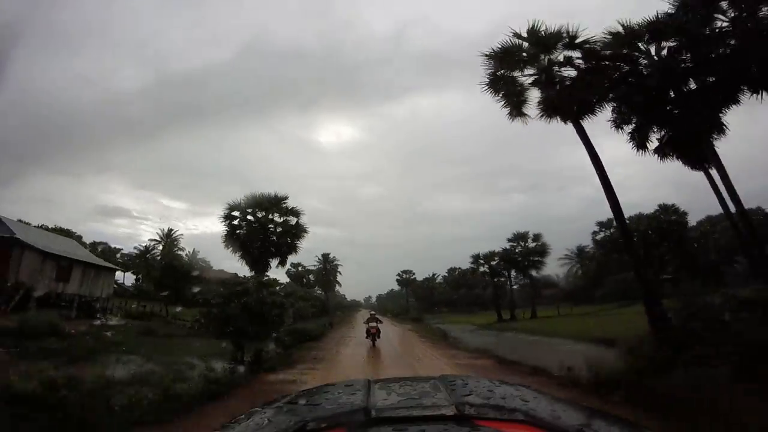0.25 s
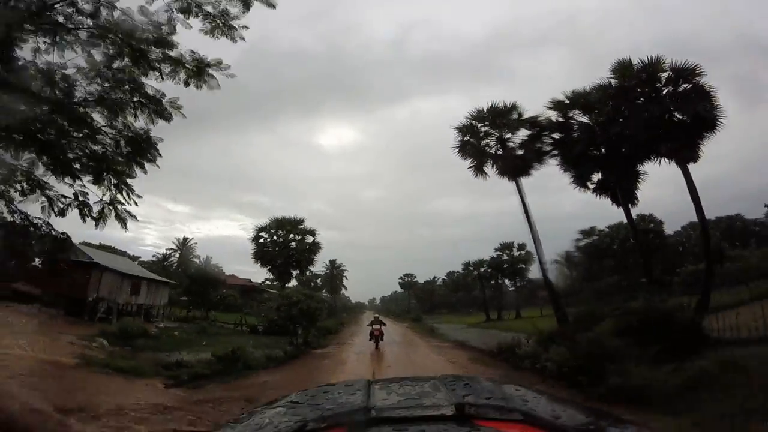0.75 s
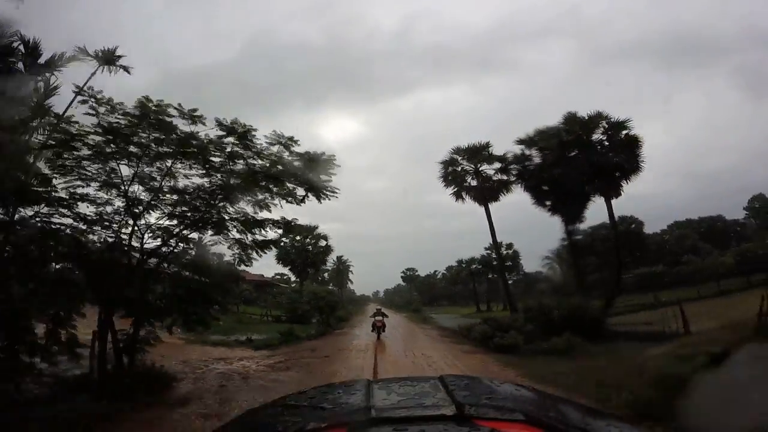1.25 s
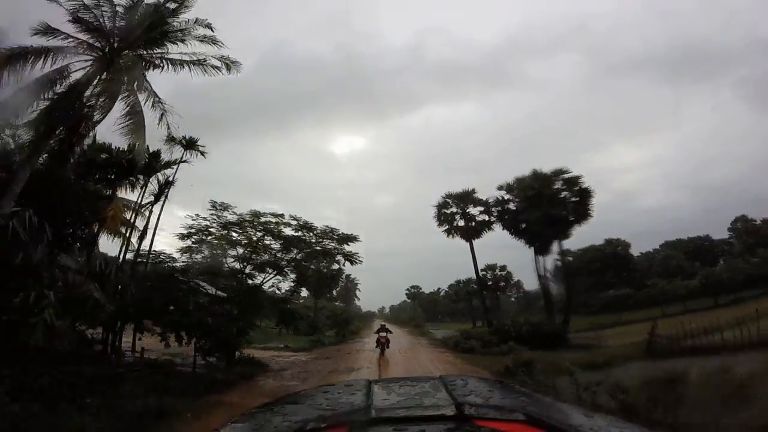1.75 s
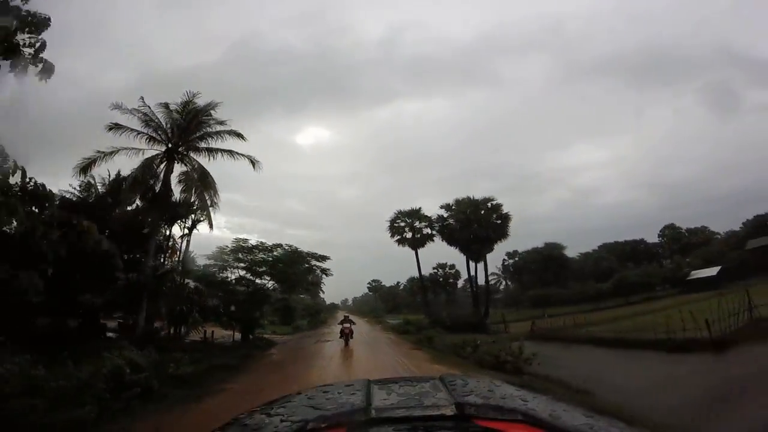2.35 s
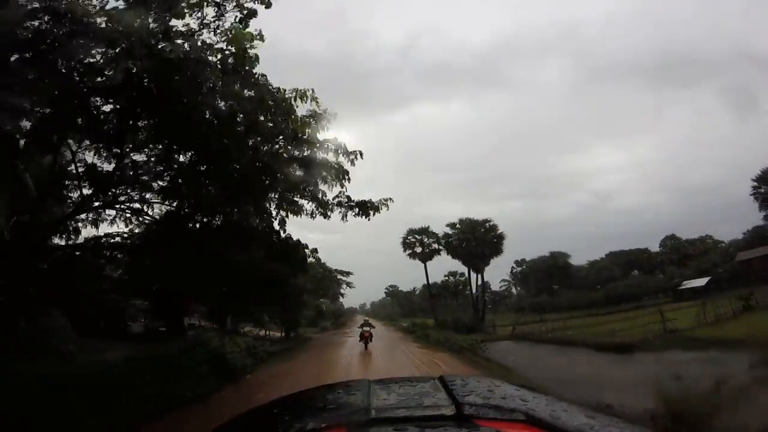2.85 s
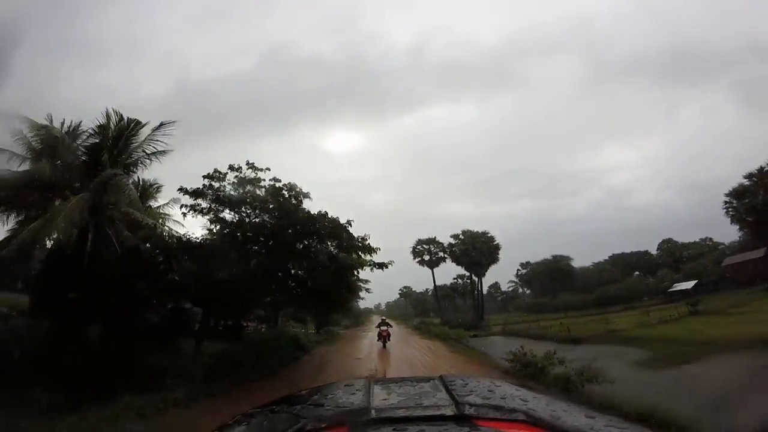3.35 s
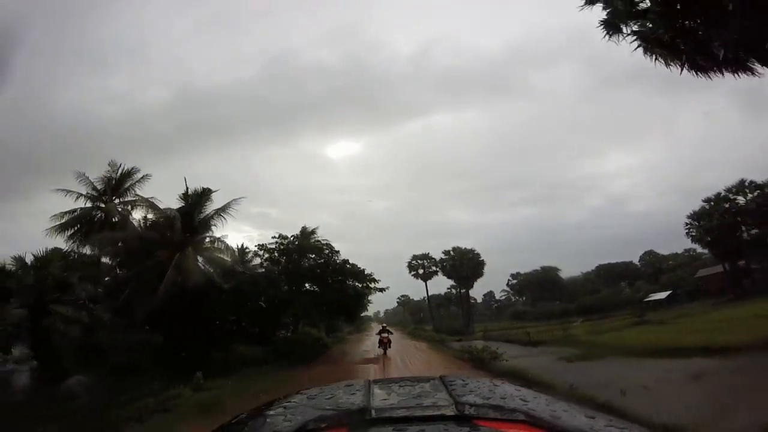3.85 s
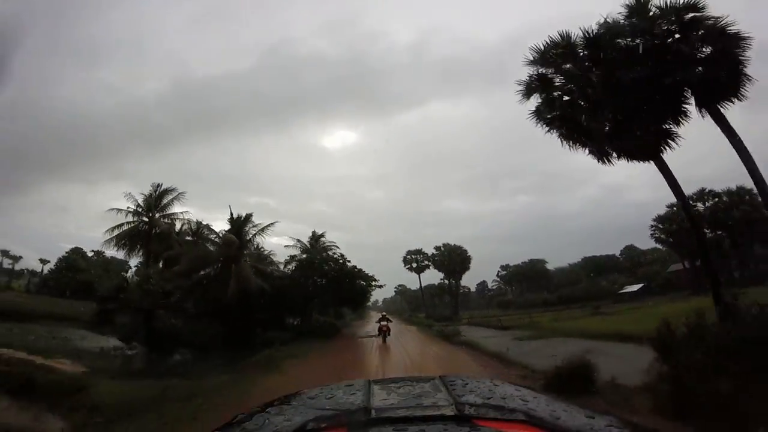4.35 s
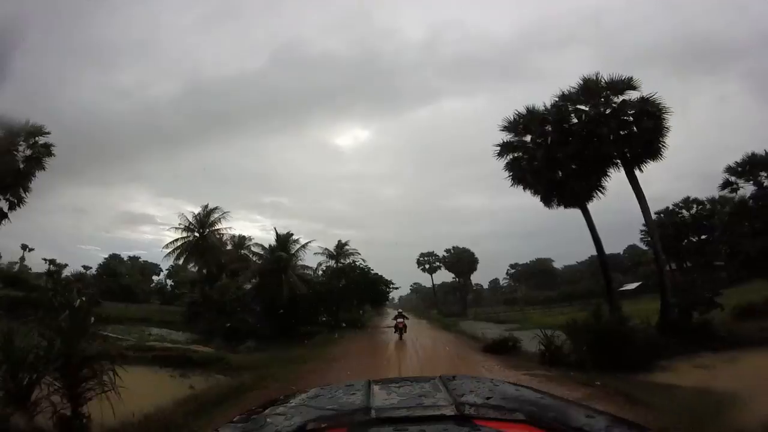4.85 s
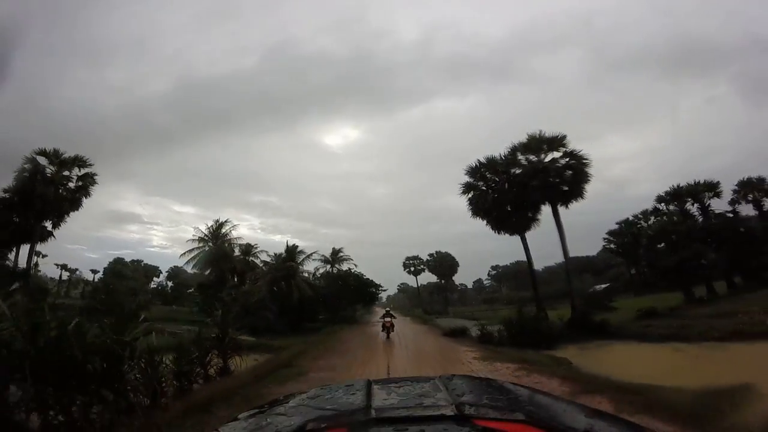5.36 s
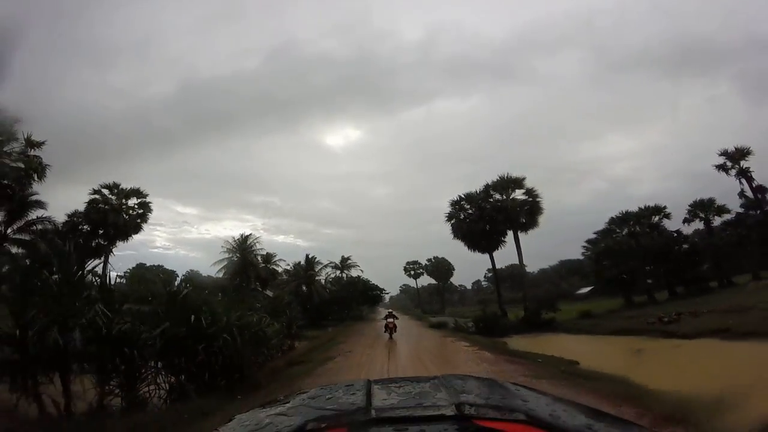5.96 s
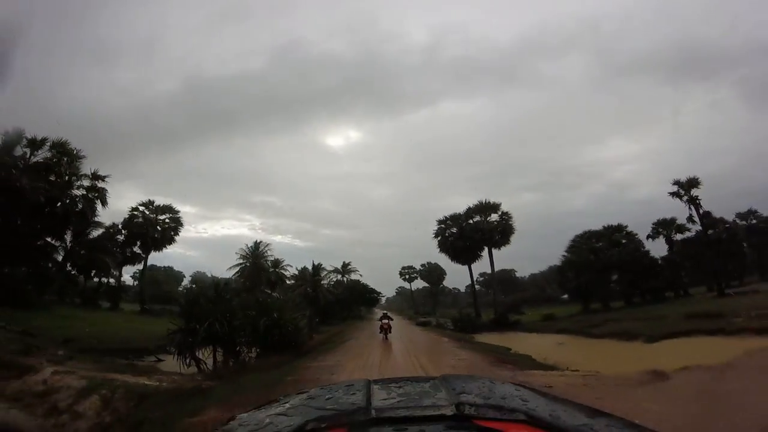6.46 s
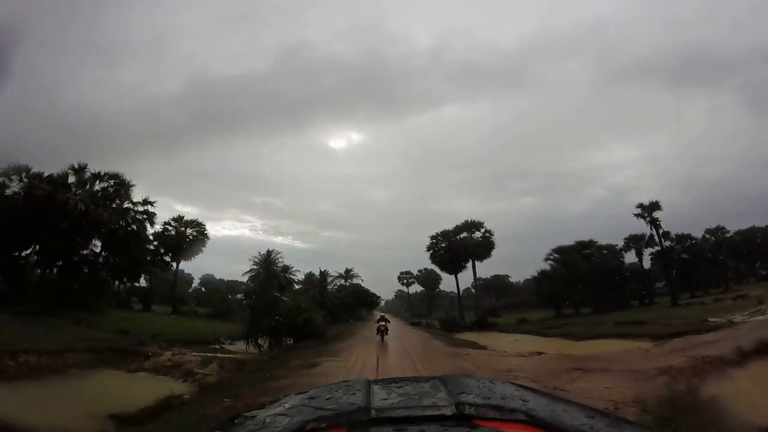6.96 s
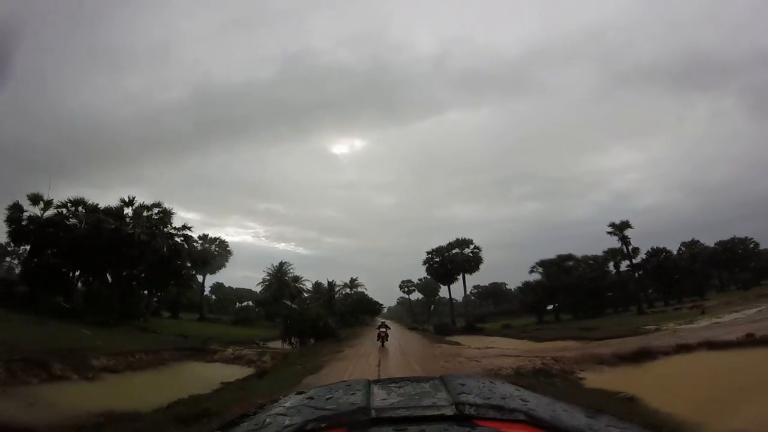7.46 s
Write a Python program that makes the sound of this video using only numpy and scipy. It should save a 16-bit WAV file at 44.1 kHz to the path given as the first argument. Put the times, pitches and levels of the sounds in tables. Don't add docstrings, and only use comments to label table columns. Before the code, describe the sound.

Raindrops crackle and tap densely on a sealed plastic camera case, close and boxy, over a muffled motorcycle engine hum and low wind buffeting.

```python
import sys
import numpy as np
from scipy import signal
from scipy.fft import rfft, irfft
from scipy.io import wavfile
from scipy.ndimage import uniform_filter1d

SR = 44100
rng = np.random.default_rng(int(sys.argv[2]) if len(sys.argv) > 2 else 0)


def amplitude_ratio(level_db):
    exponent = np.asarray(level_db, float) / 20
    return 10 ** exponent


def dump_mix(stems):
    frames = np.atleast_2d(stems).T
    limited = np.clip(frames, -1, 1)
    pcm = np.round(limited * 32767).astype(np.int16)
    wavfile.write(sys.argv[1], SR, pcm)


N = 340011

# mode in Hz, level in dB, T60 in s.
CAVITY = [(300, -4, .012), (466, -14, .05), (692, 0, .1)]


def level(x, db):
    return x * amplitude_ratio(db) / np.sqrt(np.mean(x ** 2))


def band(x, hz, width):
    return signal.lfilter(*signal.iirpeak(hz, hz / width, SR), x)


def band_twice(x, hz, width):
    return band(band(x, hz, width), hz, width)


def curve(s, values):
    return np.interp(np.arange(N) / SR, s, values)


def walk(rate):
    k = int(SR / rate)
    steps = np.repeat(rng.standard_normal(N // k + 1), k)
    return 1.867 * uniform_filter1d(uniform_filter1d(steps, k), k)[:N]


def turbulence(spectrum, lo_hz, octaves, flicker_db, rate):
    hz, db = np.transpose(spectrum)
    out = 0
    for f in lo_hz * 2 ** np.arange(0, octaves, 1 / 3):
        noise = band_twice(rng.standard_normal(N), f, f / 3)
        gain_db = np.interp(np.log(f), np.log(hz), db) + flicker_db * walk(rate)
        out = out + amplitude_ratio(gain_db) * noise
    return level(out, 0)


def strike(s, peak_db, modes, contact_s, variety=1, size=1024):
    spot_db, detune, tap_db = 2.6, .025, 3
    chance = rng.standard_normal((len(s), 2 * len(modes) + 1 + 256))
    t = np.arange(256) / SR / (contact_s * np.exp(0.4 * chance[:, :1]))
    push = chance[:, -256:] * np.tanh(9 * t) * (np.exp(-t / 1.5) + .08 * np.exp(-t / 8))
    push[:, 0] += amplitude_ratio(tap_db) * np.sqrt(np.sum(push ** 2, axis=1))
    jw = 2j * np.pi * np.arange(size // 2 + 1) * SR / size
    body = 0
    for k, (hz, db, t60) in enumerate(modes):
        w = 2 * np.pi * hz * (1 + variety * detune * chance[:, 2 * k + 1, None])
        gain = (-1) ** k * amplitude_ratio(db + variety * spot_db * chance[:, 2 * k + 2, None])
        body = body + gain * w / ((jw + np.log(1000) / t60) ** 2 + w ** 2)
    body = body * (jw / (jw + 2 * np.pi * modes[0][0])) ** 2
    body = body / (1 + jw / (3 * np.pi * modes[-1][0])) ** 2
    ring = irfft(rfft(push, size) * body, size)
    ring *= (amplitude_ratio(peak_db) / np.abs(ring).max(axis=1))[:, None]
    at = (np.asarray(s) * SR).astype(int)[:, None] + np.arange(size)
    return np.bincount(at.ravel(), ring.ravel(), N + size)[:N]


def on_case(s, walls_db, lid_db, splash_db, contact_s):
    # mode in Hz, level in dB, T60 in s.
    lid_modes = [(1545, 0, .015), (1850, -15, .008)]
    wall_modes = [(2080, -4, .006), (2640, 0, .007), (3310, -5, .007), (4100, -13, .006)]
    splash_modes = [(4250, -6, .005), (5050, -3, .003), (5600, -2, .004), (6100, -1, .004),
                    (6700, -6, .004), (7500, -6, .004), (8650, -11, .004), (9900, -12, .003),
                    (10700, -16, .003), (11600, -22, .003), (12950, -23, .003), (14900, -30, .003)]
    lid = strike(s, lid_db - .3, lid_modes, .5 * contact_s)
    walls = strike(s, walls_db - .3, wall_modes, contact_s)
    return lid + walls + strike(s, splash_db - .3, splash_modes, .8 * contact_s)


def wind():
    # frequency in Hz, level in dB per Hz.
    buffet = [(20, -15), (45, -6), (70, -12.5), (120, 0), (170, -15.5), (240, -23)]
    return amplitude_ratio(4.0) * turbulence(buffet, 22.37, 3.7, flicker_db=0.5, rate=7)


def seam_whistle():
    # time in seconds, level in dB.
    swell = [
        (4.75, -72),
        (4.95, -56),
        (5.3, -55),
        (5.58, -58),
        (5.72, -72),
    ]
    low = level(band_twice(rng.standard_normal(N), 4250, 1000), 6)
    high = level(band_twice(rng.standard_normal(N), 7620, 600), 1)
    return amplitude_ratio(curve(*np.transpose(swell))) * (low + high)


def engine():
    # time in seconds, firings per second.
    firing = [
        (0, 30.9),
        (1.9, 31.8),
        (4.7, 33.55),
        (5.9, 33.65),
        (7.71, 33.4),
    ]
    # time in seconds, level in dB.
    throttle = [
        (0, 0),
        (2.6, 0),
        (2.8, -4),
        (5.5, -5),
        (5.9, -8),
    ]
    # centre in Hz, width in Hz, level in dB.
    exhaust = [(131.4, 59, 4.5), (278.6, 86, -1.5), (340.4, 43, -0.5), (459.4, 46, 1.5)]
    cycle = np.cumsum(curve(*np.transpose(firing)) * (1 + .006 * walk(8))) / SR
    at = np.flatnonzero(np.diff(np.floor(cycle)))
    pulses = np.zeros(N)
    pulses[at] = amplitude_ratio(2.2 * rng.standard_normal(N // 500)[:len(at)])
    hum = 0
    for k, (hz, width, db) in enumerate(exhaust):
        hum = hum + (-1) ** k * amplitude_ratio(db) * band_twice(pulses, hz, 0.93 * width)
    gas = np.exp(-(cycle % 1) / 1.3) * band_twice(rng.standard_normal(N), 440, 290)
    return amplitude_ratio(curve(*np.transpose(throttle))) * level(hum, .3) + level(gas, -7)


def fine_rain(shower_db, count=1300):
    # frequency in Hz, level in dB per Hz.
    rush_spectrum = [(200, -6), (560, 17), (780, 14), (1000, -30), (1250, 8.5), (1520, 25.5), (2000, -17),
                     (2610, 14), (3340, 2.5), (4900, -26), (8590, -10), (13200, -63), (16000, -60)]
    when, size, low, high = rng.random((count, 4)).T
    walls_db = 8 * size ** 2
    lid_db = walls_db - 16 + 16 * low
    splash_db = walls_db - 25 + 12 * high ** 2
    patter = on_case(when * N / SR, walls_db, lid_db, splash_db, contact_s=.0004)
    hz = CAVITY[-1][0]
    hum = band(band(rng.standard_normal(N), hz, 28), hz, 120)
    hum = amplitude_ratio(0.14 * shower_db + 1.5 * walk(9)) * hum
    rush = turbulence(rush_spectrum, 200, 6.3, flicker_db=1.5, rate=30)
    return level(patter, -2.5) + level(rush, -4.5) + level(hum, -3.0)


def spray(count=3000):
    # mode in Hz, level in dB.
    mist = [(4300, 0), (5300, 0.5), (6500, -7.5), (8000, -11), (9800, -22.5), (11800, -14.5), (14000, -19)]
    modes = [(hz, db, .0025) for hz, db in mist]
    when, size = rng.random((count, 2)).T
    peak_db = -3.4 * np.log(size + 0.011)
    return level(strike(when * N / SR, peak_db, modes, 0.00038, size=256), 0)


def small_drops():
    # start in seconds, walls peak in dB, splash peak
    # in dB.
    darker = [(0.0565, -19, -33), (0.235, -20, -51), (0.5279, -18, -48), (0.8388, -11, -31),
              (0.9488, -23, -57), (1.2358, -18, -44), (1.3242, -17, -43), (1.37, -19, -41.0),
              (1.601, -17, -50.0), (1.8943, -36, -52), (2.3221, -24, -50), (2.4495, -23, -45),
              (2.7265, -19, -49), (2.857, -19, -46), (2.8711, -24, -39.0), (2.912, -15.5, -41.0),
              (2.962, -18.5, -38), (3.0933, -24, -47), (3.2122, -22, -46.0), (3.2154, -22.0, -33),
              (3.3271, -25, -43.0), (3.7364, -19, -39.0), (3.7526, -26, -42.0), (3.8888, -19, -41),
              (4.2174, -20, -36), (4.353, -32, -45), (4.754, -20, -41), (4.9948, -17, -40.0),
              (5.257, -20, -41.0), (5.3713, -18, -36.0), (5.4304, -19, -46), (5.5607, -19.5, -52),
              (5.678, -21, -34), (5.6963, -26, -56), (5.8234, -11, -34.0), (6.007, -17, -36),
              (6.0496, -23.0, -46.0), (6.158, -23.0, -45), (6.311, -25, -48.0), (6.423, -23.5, -42),
              (6.4764, -20.5, -39), (6.5012, -23.0, -49), (6.7382, -20.5, -35), (6.7816, -17.5, -41.0),
              (6.7938, -23, -41.0), (6.8737, -22, -49), (6.97, -24, -42.0), (7.0817, -19, -32),
              (7.1756, -18, -35), (7.4018, -22, -46),
              (0.099, -18, -32), (0.2076, -17.5, -35), (0.615, -27, -42), (0.69, -20, -41),
              (0.8114, -23, -31), (1.3015, -23, -44), (1.5878, -22, -35.0), (1.7075, -17, -25),
              (1.834, -33, -41.0), (2.037, -27, -46), (2.1596, -12.5, -31), (2.185, -23, -45),
              (2.201, -25, -57), (2.21, -20, -40), (2.387, -17, -36.0), (2.4644, -21, -40.0),
              (2.5133, -10, -33), (2.735, -19, -41), (3.1016, -31, -44), (3.1182, -12.5, -29.0),
              (3.189, -26, -42), (3.27, -23.0, -39), (3.6832, -21, -39), (3.7736, -12, -32.0),
              (3.8348, -20, -39), (3.8776, -22, -40), (3.923, -18, -33), (4.1094, -18, -35.0),
              (4.1202, -27, -40), (4.429, -23, -32.0), (4.7035, -17, -27), (4.8077, -12.5, -32),
              (5.013, -33, -33), (5.232, -14, -37), (5.344, -20, -31), (5.5695, -18, -36),
              (5.7517, -17, -35.0), (5.883, -23, -35), (5.9091, -28, -40), (5.9438, -18, -36),
              (6.0293, -34, -40.0), (6.064, -18, -35.0), (6.923, -14, -40), (7.0047, -12, -22),
              (7.2074, -18, -37), (7.2434, -8, -33), (7.2813, -27, -35), (7.4177, -18, -35.0),
              (7.433, -13, -38), (7.506, -19, -71)]
    bright = [(0.018, -29, -26), (0.592, -26, -40), (0.8528, -25, -31), (0.975, -34.0, -31),
              (1.025, -24, -30), (1.3469, -38, -37), (1.7229, -11, -15), (1.9034, -23, -35),
              (1.925, -21.0, -33), (1.983, -30, -28), (2.178, -27, -44), (2.2212, -30, -35),
              (2.371, -7.5, -33), (2.4888, -19, -40), (2.5626, -21, -31), (2.59, -21, -44),
              (2.6656, -29, -22), (2.6718, -25, -27), (2.777, -23, -26), (2.8107, -24.0, -28),
              (3.2774, -17, -31), (3.673, -23, -24), (3.7459, -19, -24), (3.9332, -32, -31),
              (4.0767, -30, -39), (4.2113, -31, -28), (4.379, -24, -27.0), (4.456, -27, -29),
              (4.4711, -26, -32), (4.512, -30, -25), (4.5518, -25, -25), (4.653, -26, -32),
              (4.7323, -24, -30), (4.7784, -27, -26), (4.885, -28, -30), (5.216, -19, -35),
              (5.273, -28.0, -29), (5.287, -22, -34), (5.3857, -23, -40), (5.565, -30, -34),
              (5.682, -20, -27.0), (5.6893, -22, -21), (5.8179, -25, -35.0), (5.8957, -20, -37.0),
              (5.9005, -22, -40), (6.0566, -19, -32), (6.124, -17, -24), (6.3315, -18, -31),
              (7.1073, -15, -21), (7.515, -19, -24), (5.638, -32, -26), (7.024, -26, -27)]
    s, walls_db, splash_db = np.transpose(darker + bright)
    return on_case(s - .0004, walls_db, walls_db - 12, splash_db, contact_s=0.0013)


def light_drops():
    # start in seconds, walls peak in dB, splash peak in dB.
    bright = [(0.337, -16, -29), (0.3658, -20, -20.5), (0.447, -13.5, -21.5), (1.503, -12, -21),
              (1.6489, -15, -30), (1.7745, -17, -23), (1.975, -13, -31.5), (2.6256, -12, -20),
              (3.359, -13.5, -18), (3.545, -13, -24), (3.706, -16, -27), (4.2217, -11, -19.5),
              (4.3894, -13, -18), (4.399, -11.5, -19), (4.484, -15, -20), (4.5447, -22, -16),
              (4.702, -21, -26), (4.8968, -11.5, -22.5), (5.191, -22, -13), (5.505, -13, -23),
              (6.109, -17, -17), (6.2, -13.5, -26), (6.281, -10, -29), (6.842, -15, -24),
              (7.2886, -19, -31), (7.5372, -17, -27)]
    # start in seconds, walls peak in dB.
    faint = [(0.0516, -14.5), (0.122, -17.5), (0.1535, -14), (0.843, -15), (1.203, -12), (1.2773, -13),
             (1.4524, -13), (1.612, -19), (2.317, -17), (2.422, -14), (2.511, -17), (2.9027, -13),
             (2.9308, -15), (3.1165, -25), (3.1987, -12.5), (3.2296, -15), (3.3457, -13), (3.7731, -37),
             (3.8, -15), (4.0037, -11.5), (4.218, -21), (4.6377, -11), (4.809, -25), (5.4567, -14),
             (5.528, -13), (5.7717, -9.5), (6.911, -15), (6.926, -19), (7.2309, -12), (7.435, -10)]
    rows = [(s, db, db - 11, wet) for s, db, wet in bright]
    rows += [(s, db, db - 24, db - 22) for s, db in faint]
    s, walls_db, lid_db, splash_db = np.transpose(rows)
    return on_case(s - .0003, walls_db, lid_db, splash_db, contact_s=0.0016)


def heavy_drops():
    # start in seconds, walls peak, lid peak and splash peak in dB.
    on_lid = [(0.0239, -8, -3.5, -15), (0.2905, -4, -6, -22), (0.5034, -17, -19, -31),
              (0.6557, -2, -2, -29), (0.7388, -11, -7.5, -21), (0.9628, -7.5, -7.5, -19),
              (1.0042, -4, -7.5, -23), (1.1271, -8, -9.5, -43), (1.2406, -11.5, -10.5, -17.5),
              (1.3122, -4.5, -6, -22), (2.0553, -13, -36, -18), (2.4063, -8, -9, -16.5),
              (3.1605, -9.5, -8.5, -14), (3.317, -20, -20, -38), (3.6045, -6, -10.5, -16.5),
              (3.8063, -3.5, -0.5, -14), (4.1387, -5.5, -9.5, -17.5), (4.3612, -25, -9, -14.5),
              (4.8259, -20, -6.5, -13.5), (5.1415, -6.5, -8.5, -12.5), (5.2472, -2.5, -4, -30),
              (5.4101, -5.5, -5.5, -13), (5.7204, -16, -4, -12), (5.8729, -6, -11, -17),
              (6.1334, -5.5, -4, -36), (6.2907, -15.5, -14, -20), (6.336, -10.5, -9, -26),
              (6.558, -17, -7, -20), (7.4461, -6.5, -6.5, -13), (7.7081, -4, -3, -11)]
    # start in seconds, walls peak in dB, splash peak in dB.
    at_port = [(0.3209, -4.5, -9), (1.5112, -17, -7.5), (1.575, -13.5, -10), (1.7225, -14, -13),
               (1.7329, -8, -5.5), (1.8102, -0.5, -2), (1.9898, -13, -11), (2.006, -9, -2),
               (2.1633, -9.5, -6), (2.434, -11, -14.5), (2.716, -2.5, -1.5), (3.638, -6.5, -2.5),
               (3.9957, -10, -9), (4.0874, -10, -8.5), (4.3725, -7.5, -12.5), (4.63, -9, -11),
               (4.677, -13, -3.5), (4.698, -10, -14), (5.197, -5.5, -6.5), (5.21, -6, -7), (5.731, -4, -8),
               (5.9247, -4.5, -3), (6.0934, -4.5, -1), (6.3603, -7.5, -8), (7.0169, -7, -14),
               (7.1968, -9.5, -15.5), (7.5081, -12, -13.5), (7.5329, -9, -12.5), (7.6256, -21, -7.5),
               (7.6674, -9, -4.5)]
    on_rim = [(0.7043, -12.5, -25), (0.7508, -17, -23), (0.772, -3, -30), (1.103, -2, -22),
              (1.559, -17, -18), (2.4718, -5.5, -16), (2.6112, -12.5, -21), (2.754, -9.5, -17),
              (2.881, -10, -20), (3.068, -7.5, -15), (3.1322, -13.5, -26), (3.427, -2, -22),
              (3.8241, -7, -18), (4.1298, -10, -15), (4.269, -3.5, -16), (4.7688, -9.5, -17),
              (4.9469, -6.5, -19), (5.092, -9.5, -16.5), (5.2527, -18, -39), (5.3929, -10, -14.5),
              (5.8253, -15, -22), (5.861, -7.5, -17), (5.9895, -8, -20), (6.0012, -8, -26),
              (6.2316, -15, -22.0), (6.5905, -10, -23), (6.69, -12, -20), (7.1039, -8, -10),
              (7.3694, -8.5, -19.5), (7.581, -0.5, -11.5)]
    on_near_wall = [(0.2424, -1.5, -8.5), (0.3165, -13, -20), (0.9241, -10, -20), (1.0885, -1.5, -19),
                    (1.416, -4.5, -18), (1.694, -10.5, -22), (1.868, -7, -13.5), (1.874, -3.5, -8),
                    (1.9119, -8.5, -17), (2.155, -15.5, -24), (2.369, -5, -15.5), (2.5017, -5, -13),
                    (3.3138, -3.5, -11), (3.653, -9, -14), (3.7796, -15, -15), (4.5027, -12, -22),
                    (4.5616, -9, -21), (4.5975, -9.5, -22), (5.2376, -5, -20), (5.4067, 1.5, -10),
                    (5.669, -7.5, -14.5), (5.9158, -6.5, -15), (5.994, -4, -12), (6.0056, -15, -34),
                    (6.212, -10.5, -24), (6.5491, -11, -22.5), (6.9648, -11.5, -21.5), (7.316, -10.5, -20),
                    (7.4285, -5, -11.5), (7.5282, -14, -40)]
    # start in seconds, walls peak in dB.
    on_far_wall = [(0.0344, -3), (0.371, -8.5), (0.939, -6.5), (0.988, -14), (1.013, -11), (1.268, -13),
                   (1.3861, -2), (1.69, -10), (1.9945, -3.5), (2.3756, -9), (2.499, -6), (2.6281, -7),
                   (2.823, -2.5), (3.6251, 0), (3.785, -7.5), (3.7938, 0), (4.2325, -3.5), (4.8528, -8.5),
                   (5.3565, -8), (5.4628, -0.5), (5.8368, -5), (6.0209, 0.5), (6.8594, -9), (7.0045, -7),
                   (7.01, -2.5), (7.2432, -12), (7.2545, -2.5), (7.2732, -3), (7.2784, -5.5), (7.3346, -7)]
    # start in seconds, splash peak in dB.
    port_ticks = [(0.647, -22.5), (1.7884, -25), (1.9637, -21), (2.482, -19), (2.6762, -24), (2.73, -24),
                  (2.8687, -22.5), (3.037, -20.5), (3.049, -21), (4.4325, -18.5), (4.759, -19.5),
                  (5.652, -19), (5.7023, -19), (5.806, -22), (6.4715, -26.5), (6.518, -25), (6.8205, -23),
                  (7.3845, -29), (7.39, -23.0), (7.543, -22), (7.5594, -23), (7.632, -15)]
    # mode in Hz, level in dB, T60 in s.
    thud = [(330, 0, .01)]
    rows = on_lid + [(s, db, db - 10, wet) for s, db, wet in at_port]
    rows += [(s, db + 4.5, db - 15, db) for s, db in port_ticks]
    rows += [(s, db, db - 4, wet) for s, db, wet in on_rim]
    rows += [(s, db, db - 15.5, wet) for s, db, wet in on_near_wall]
    rows += [(s, db, db - 15, db - 23.5) for s, db in on_far_wall]
    s, walls_db, lid_db, splash_db = np.transpose(rows)
    out = on_case(s - .0002, walls_db, lid_db, splash_db, contact_s=0.00038)
    return out + strike(s, lid_db - 22, thud, 0.00033)


def window_drops():
    # start in seconds, cavity ring peak in dB, pane ring peak in dB.
    hits = [(0.024, -31, -30), (0.3207, -27, -26), (1.0879, -34, -25), (2.312, -27, -37), (3.955, -29, -34),
            (5.69, -25, -40), (0.561, -24, -53), (1.479, -31, -26), (1.5114, -16, -6), (1.5589, -20, -16),
            (1.6901, -20.5, -36), (1.7329, -25.5, -16), (1.81, -52, -5.5), (2.0058, -19, -3),
            (2.0552, -24.5, -9), (2.164, -24.5, -41), (2.676, -22.5, -26), (2.7159, -30, -13),
            (2.8689, -22.5, -16), (3.3131, -25, -14), (3.6381, -24, -20), (4.0873, -19.5, -9.5),
            (4.4329, -25, -20), (4.6295, -22.5, -48.5), (4.677, -10.5, -9), (5.197, -20.5, -15),
            (5.731, -23, -11), (5.8609, -22, -18), (5.9248, -22.5, -27), (6.0931, -11, -4),
            (6.36, -16, -0.5), (7.5332, -24, -32), (7.6256, -17.5, -3.5)]
    # mode in Hz, level in dB, T60 in s.
    pane_modes = [(1690, 0, .03)]
    s, cavity_db, pane_db = np.transpose(hits)
    cavity = strike(s, cavity_db + .3, CAVITY, .00012, variety=.15, size=8192)
    return cavity + strike(s, pane_db - 1.3, pane_modes, .0001, variety=.15, size=4096)


def scene():
    # time in seconds, slow recorder gain in dB, spray at the port in dB.
    ride = [(0, -39.5, -64), (1.03, -43.5, -49.5), (1.59, -36, -53.5), (1.91, -36, -44), (2.17, -40, -50.5),
            (2.45, -38.5, -53), (2.62, -37.5, -44), (2.88, -43, -60), (3.33, -39, -56), (3.93, -40.5, -54),
            (4.21, -38, -53.5), (4.55, -37, -48.5), (4.83, -39.5, -59.5), (5.82, -36.5, -49.5),
            (6.1, -41, -71), (6.36, -47.5, -62), (7.26, -38, -52.5), (7.71, -35, -47)]
    s, gain_db, shower_db = np.transpose(ride)
    gain_db, shower_db = curve(s, gain_db), curve(s, shower_db)
    spray_db = shower_db - gain_db
    rain = amplitude_ratio(4.5) * fine_rain(spray_db) + amplitude_ratio(spray_db + 2.0 + 2.0 * walk(30)) * spray()
    rain = signal.sosfilt(signal.butter(12, 14900, fs=SR, output="sos"), rain)
    steady = amplitude_ratio(gain_db) * (wind() + amplitude_ratio(1.5) * engine() + rain) + seam_whistle()
    drops = small_drops() + light_drops() + heavy_drops() + window_drops()
    held = signal.lfilter([1], [1, -np.exp(-1 / (0.09 * SR))], drops ** 2) / (0.0096 * SR)
    return (drops + steady / (1 + held / amplitude_ratio(-45.0)) ** 0.23)[None]


def roll_off(x):
    return signal.sosfilt(signal.butter(12, 16490, fs=SR, output="sos"), x)


def record(dry):
    rounded = .9 * np.tanh(dry / .9)
    heard = signal.sosfilt(signal.butter(10, 15300, fs=SR, output="sos"), rounded)
    return roll_off(heard)


dry = scene()
out = record(dry)
dump_mix(out)
```